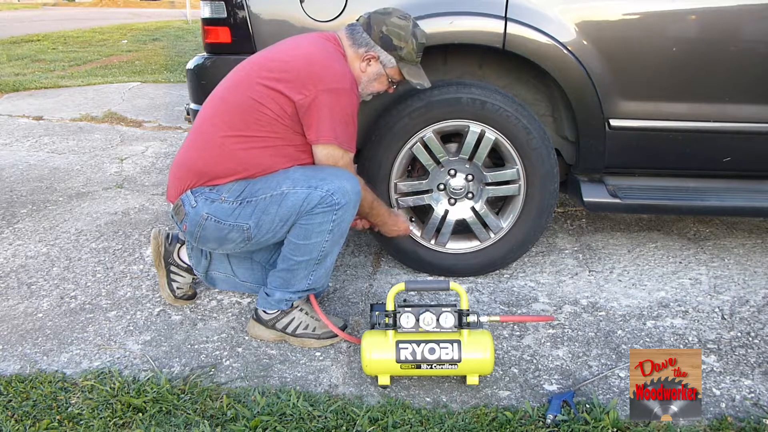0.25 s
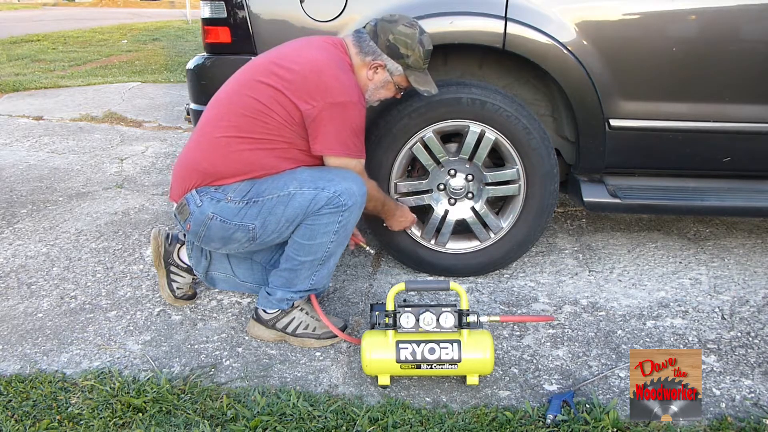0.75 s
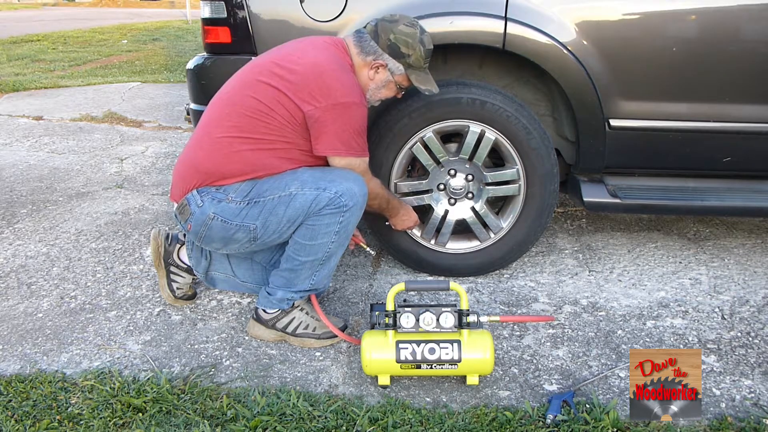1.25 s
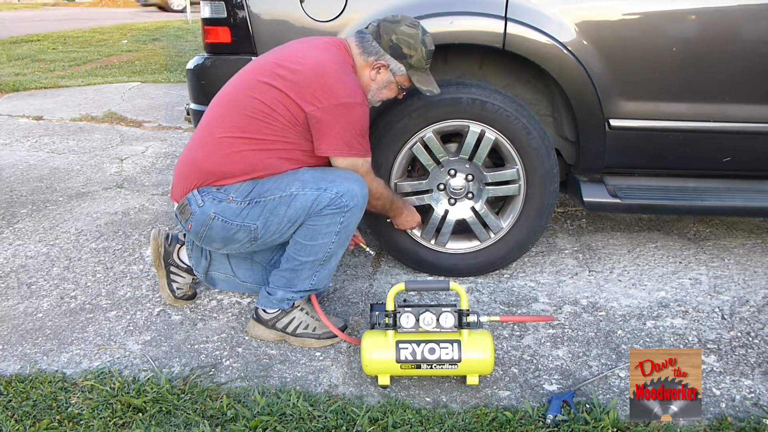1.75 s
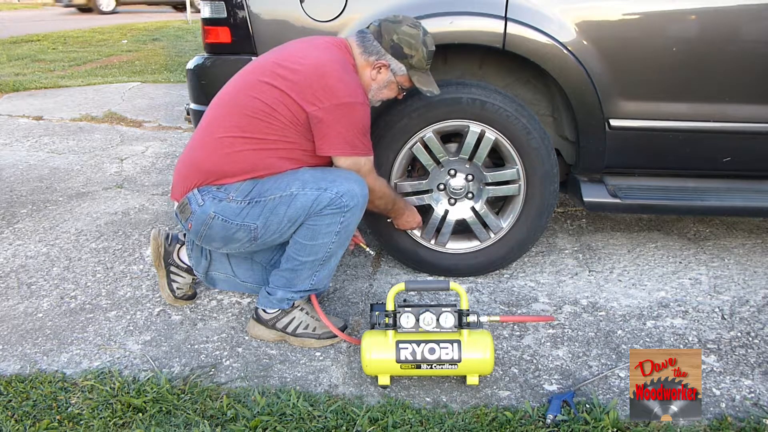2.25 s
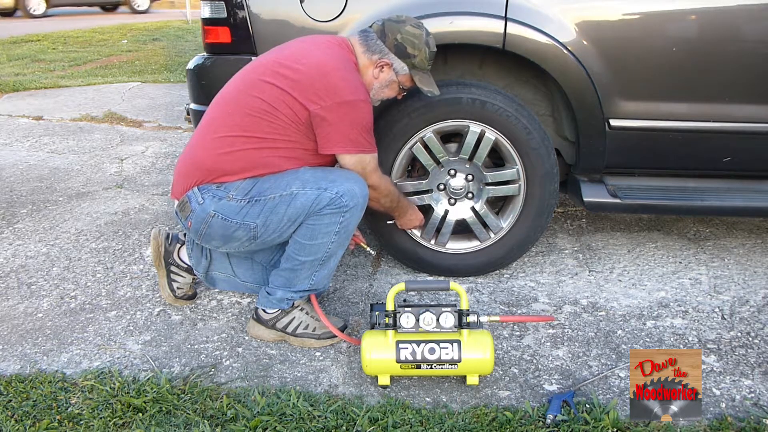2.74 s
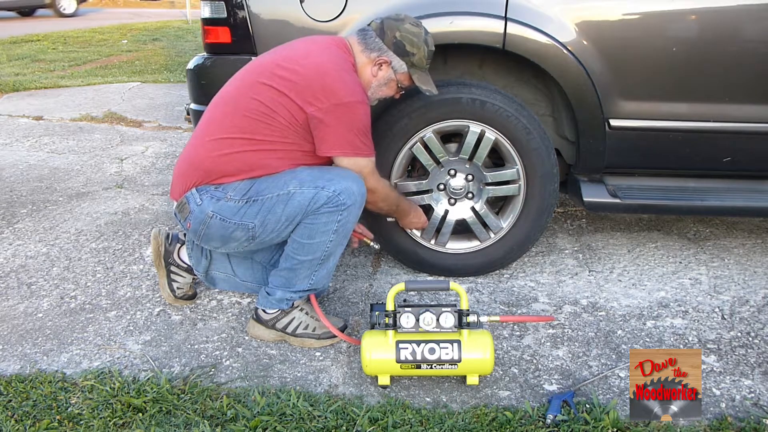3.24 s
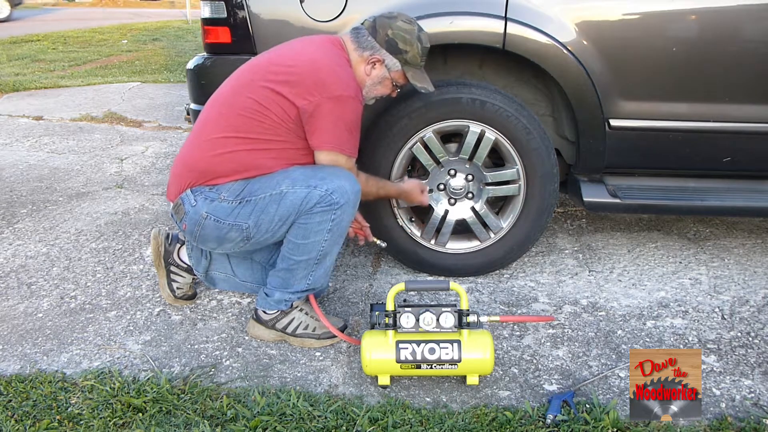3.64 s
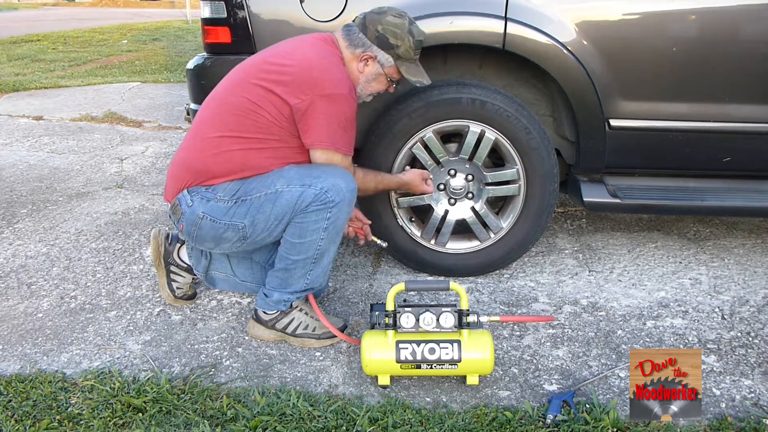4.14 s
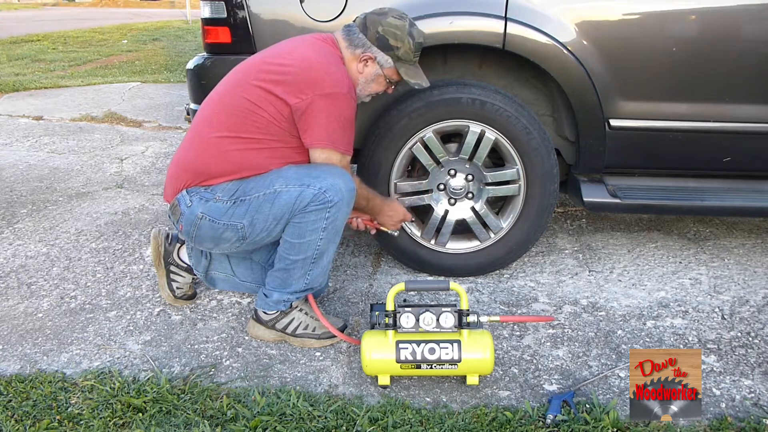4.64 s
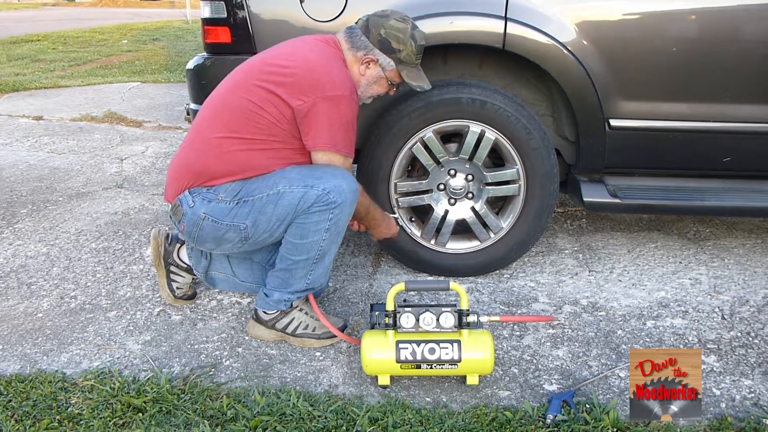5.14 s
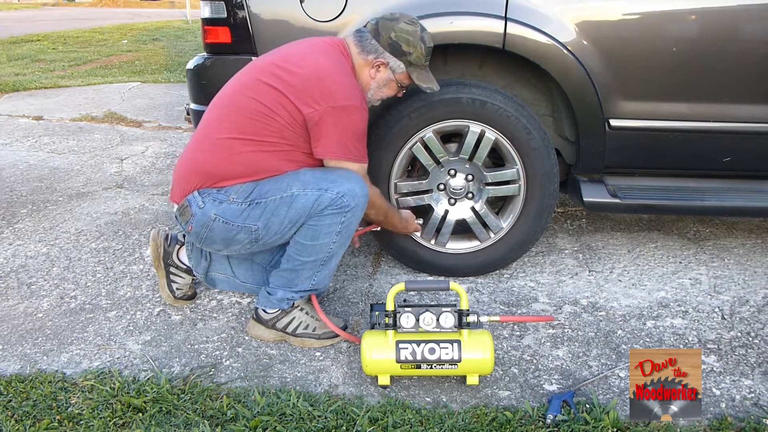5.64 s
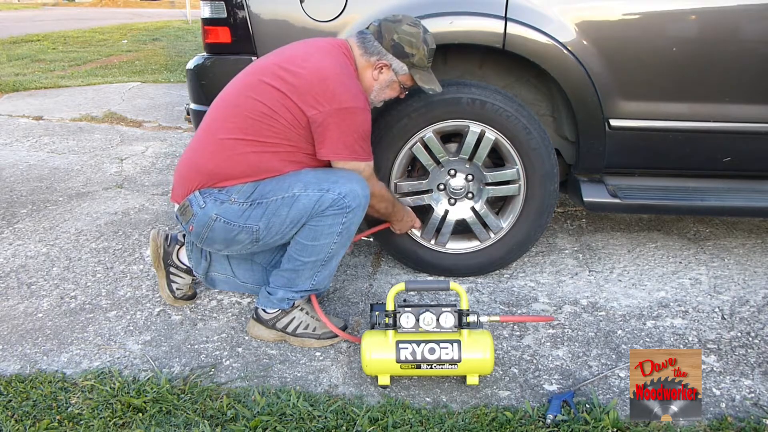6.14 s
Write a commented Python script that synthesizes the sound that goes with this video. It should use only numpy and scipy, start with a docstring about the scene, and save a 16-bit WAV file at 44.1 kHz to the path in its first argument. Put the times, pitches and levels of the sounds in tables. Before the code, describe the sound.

A small air compressor hums steadily outdoors while air hisses briefly at a tire valve, then spits once.

```python
"""A hum of about 86 strokes a second: a small cordless piston compressor fills a tyre on a concrete
driveway, in open air, slightly right of the microphone. Its metal parts sing and rattle, air rushes
through its valves, and it slows a little and grows harsher as the tank pressure rises.
From about 2 s air hisses as the hose chuck is handled at the tyre valve, then spits once;
the recorder's gain ducks under the escaping air."""
import sys
import numpy as np
from scipy import signal
from scipy.fft import rfft, irfft
from scipy.io import wavfile
from scipy.ndimage import uniform_filter1d

SR = 44100
rng = np.random.default_rng(int(sys.argv[2]) if len(sys.argv) > 2 else 0)


def persist_wave(psi):
    """Save psi, clipped to +-1, as 16-bit WAV."""
    counts = np.round(np.clip(psi, -1, 1) * 32767).astype(np.int16)
    wavfile.write(sys.argv[1], SR, np.atleast_2d(counts).T)


N = 281358
TIME = np.arange(N) / SR
START_HZ = 85.95  # strokes a second at first

# strong low orders of the stroke: (multiple of crank speed, light-load level [dB], heavy-load level [dB])
STROKE_ORDERS = [(1, -37, -37), (2, -18, -18), (3, -19, -20), (3.5, -26, -29), (4, -10, -11),
                 (4.5, -35, -39), (5, 0, 0), (5.5, -20, -23), (6, -34, -33), (6.5, -25, -27), (7, -6, -7),
                 (8, -8, -9), (9, -12, -16), (10, -18, -20), (11, -20, -19), (12, -17, -19), (13, -25, -26),
                 (14, -11, -17), (15, -29, -28), (16, -27, -23), (17, -33, -32), (18, -37, -24),
                 (19, -35, -34)]
# high orders that casing and tank radiate well:
# (multiple of crank speed, light-load level [dB], heavy-load level [dB])
RADIATED_ORDERS = [(23, -34, -31), (25, -30, -40), (26, -37, -35), (29, -35, -40), (31, -42, -37),
                   (33, -42, -34), (34, -35, -44), (37, -44, -29), (38, -46, -29), (39, -39, -32),
                   (40, -34, -35), (41, -36, -36), (42, -41, -33), (44, -39, -37), (45, -45, -30),
                   (46, -35, -37), (47, -28, -38), (49, -34, -31), (57, -39, -45), (58, -46, -34),
                   (59, -45, -38), (61, -40, -34), (71, -51, -41), (72, -41, -50), (73, -39, -44),
                   (74, -42, -45), (77, -44, -38), (90, -44, -42)]
# orders that swell as they pass through a metal resonance:
# (multiple of crank speed, peak time [s], level against the hum [dB], rise [s], fall [s])
SINGING_ORDERS = [(35, 0.68, -23.5, 0.71, 0.15), (35, 1.54, -16, 0.14, 0.52), (36, 1.92, -12.6, 0.72, 1.75),
                  (48, 1.76, -20.3, 0.8, 0.8)]


def from_db(db):
    """Decibels to gain."""
    return 10 ** (np.asarray(db) / 20)


def at_hz(points, hz, column=1):
    """One column of a spectrum, read on a log-frequency axis."""
    points = np.array(points)
    return np.interp(np.log(np.maximum(hz, 1)), np.log(points[:, 0]), points[:, column])


def drift(rate_hz):
    """Smooth random wavering with spread 1, mostly slower than rate_hz."""
    pole = np.exp(-80 * np.pi * rate_hz / SR)
    slow = signal.lfilter([1], [1, -2 * pole, pole * pole], rng.standard_normal(N // 40 + 2002))[2000:]
    return np.interp(np.arange(N) / 40, np.arange(len(slow)), slow / slow.std())


def coloured(x, spectrum):
    """Filter a sound by a table of (frequency [Hz], gain [dB])."""
    return irfft(rfft(x) * from_db(at_hz(spectrum, np.arange(N // 2 + 1) * SR / N)), N)


def crank(wobble, jitter_s, sag_hz=1.4, sag_s=10.8):
    """Turns of the crank: it slows as pressure builds, wavers, and strokes come a little early or late."""
    speed = START_HZ - sag_hz * (1 - np.exp(-TIME / sag_s))
    return np.cumsum(speed * (1 + wobble * drift(3.5))) / SR + speed * jitter_s * drift(52)


def stroke_cycle(lines, turns, size=16384):
    """Play complex rms strengths of orders 0, 1/2, 1, .. as a cycle two strokes long."""
    cycle = irfft(lines, size) * size / np.sqrt(2)
    return np.interp(turns / 2 % 1 * size, np.arange(size + 1), np.append(cycle, cycle[0]))


def order_gains(orders, hz, column):
    """Strength of the pump's orders at one load (column 1 light, 2 heavy), without the singing ones."""
    # rattle of piston and gears: (frequency [Hz], light-load level [dB], heavy-load level [dB])
    rattle = [(1840, -41, -43.5), (2430, -55, -50), (3000, -40, -32), (3940, -55, -47), (4400, -55, -46.5),
              (5330, -44.5, -41.5), (6700, -46, -47), (7100, -45, -49), (8100, -51.5, -46),
              (9200, -49.5, -59), (9800, -52, -52), (11600, -58, -59), (13400, -59, -65), (14800, -80, -73)]
    # half orders, as every other stroke differs a little: (frequency [Hz], level [dB])
    uneven_strokes = [(43, -66), (130, -50), (215, -42.5), (600, -46), (1100, -39), (1700, -50.5),
                      (2400, -46), (3200, -50), (5000, -57.5), (8000, -66), (15000, -60)]
    db = np.where(orders % 1, at_hz(uneven_strokes, hz), at_hz(rattle, hz, column))
    for row in STROKE_ORDERS + RADIATED_ORDERS:
        db[round(2 * row[0])] = row[column]
    sings = np.isin(orders, [row[0] for row in SINGING_ORDERS])
    return from_db(db) * (orders > 0) * ~sings


def pump(turns, scatter_db, wander, intake_hz, smear, rattle_hz, rocking_db, side_db, count=360):
    """Each stroke is a sharp gulp of air in the low orders and a spread of small contacts higher up."""
    light_until_s, heavy_from_s = 1.28, 4.86
    orders = np.arange(count) / 2
    hz = np.maximum(orders * START_HZ, 1)
    light, heavy = order_gains(orders, hz, column=1), order_gains(orders, hz, column=2)
    half = orders % 1 > 0
    weak = ~np.isin(orders, [row[0] for row in STROKE_ORDERS + RADIATED_ORDERS])
    loose = 1 / (1 + (rattle_hz / hz) ** 8)  # 0 in the hum, 1 in the rattle
    # suction is a pressure dip: orders near the intake resonance fall in step, the rattle does not
    lag = smear * np.log(hz / intake_hz) ** 2
    phase = np.pi - lag + np.where(half, 1, loose) * rng.uniform(-np.pi, np.pi, count)
    # the many modes of the casing favour some of the weak orders over their neighbours
    scatter = from_db(scatter_db * loose * weak * np.clip(rng.standard_normal((2, count)), -2, 1.5))
    # the pump rocks on its feet every second stroke, which lifts the half orders
    rocking = from_db(rocking_db * half * (1 - loose))
    voicing = scatter * rocking * np.exp(1j * phase)
    load = np.clip((TIME - light_until_s) / (heavy_from_s - light_until_s), 0, 1)
    hum = (1 - load) * stroke_cycle(light * voicing[0], turns)
    hum += load * stroke_cycle(heavy * voicing[1], turns)
    # the contacts shift slowly, so the weak high orders wander in strength
    rattle = loose * np.sqrt(light * heavy) * np.exp(2j * np.pi * rng.random((4, count)))
    shifting = wander * sum(drift(0.59) * stroke_cycle(weak * lines, turns) for lines in rattle[1:])
    # reflections from car and ground reach the two sides of the microphone differently
    side = from_db(side_db) * stroke_cycle(rattle[0], turns)
    return hum + shifting + np.array([side, -side])


def singing_metal(turns, flutter_db):
    """Metal parts ring as single orders drift through their resonances; neighbours beat once a stroke."""
    gains = {}
    for order, peak_s, db, rise_s, fall_s in SINGING_ORDERS:
        # 3 dB down rise_s before the peak and fall_s after it
        swell = 1 / np.hypot(1, (TIME - peak_s) / np.where(TIME < peak_s, rise_s, fall_s))
        gains[order] = np.maximum(gains.get(order, 0), from_db(db) * swell)
    ringing = np.zeros(N)
    for order, gain in gains.items():
        flutter = from_db(flutter_db * drift(25))
        ringing += np.sqrt(2) * gain * flutter * np.sin(2 * np.pi * (order * turns + rng.random()))
    return ringing


def turbulence(spectrum, side_db, ripple_db, ripple_hz=170):
    """Air noise with a fine random ripple in its treble; near rms 1 and much alike on both sides."""
    hz = np.arange(ripple_hz, SR / 2, ripple_hz)
    ripple = ripple_db * np.minimum(hz / 5000, 1) * np.clip(rng.standard_normal(len(hz)), -2, 1.2)
    air = coloured(rng.standard_normal((2, N)), spectrum)
    mid, side = coloured(air, np.column_stack([hz, ripple]))
    return (mid + from_db(side_db) * np.array([side, -side])) / mid.std()


def intake_rush(turns, level_db, pulsing_db):
    """Air noise, coloured by the pump head, swells several times in each stroke as the valves flap."""
    # air rushing through intake and valves: (frequency [Hz], relative level [dB])
    rush_colour = [(30, -112), (150, -86.5), (420, -78.5), (850, -81.5), (1200, -78.5), (1750, -90),
                   (2500, -93.5), (3100, -88), (4100, -88.5), (4500, -94.5), (7000, -99), (9200, -101),
                   (11500, -104), (15000, -113)]
    # treble resonances of the pump head: (frequency [Hz], width [Hz], lift [dB])
    head_modes = [(5300, 410, 5), (6540, 310, 9.5), (7770, 510, 9.5), (8540, 350, 8), (9930, 700, 9.5),
                  (11600, 500, 8.5), (12600, 340, 3), (13700, 440, 7)]
    hz = np.geomspace(20, SR / 2, 600)
    head_db = sum(db / (1 + (2 * (hz - centre) / width) ** 2) for centre, width, db in head_modes)
    air = turbulence(np.column_stack([hz, at_hz(rush_colour, hz) + head_db]), side_db=-14, ripple_db=3)
    flaps = np.zeros(14, complex)
    flaps[2::2] = np.exp(2j * np.pi * rng.random(6))  # whole orders 1 to 6
    swell = stroke_cycle(flaps, turns)
    return from_db(level_db + pulsing_db * swell / swell.std()) * air


def puff(start_s, hold_s, attack_s, release_s):
    """Envelope of escaping air: it grows until start_s, holds at 1 and dies away."""
    before_s, after_s = np.maximum(start_s - TIME, 0), np.maximum(TIME - start_s - hold_s, 0)
    return np.exp(-before_s / attack_s - after_s / release_s)


def jet(flow, colour, sputter_db, grain_db):
    """Escaping air, grainy and sputtering as the seal shifts."""
    unsteady = from_db(sputter_db * drift(43) + grain_db * drift(250))
    return flow * unsteady * turbulence(colour, side_db=-13, ripple_db=-1.0)


def chuck_leaks():
    """Air slips past the chuck as a thin hiss and a full gush; the widest opening rules at each moment."""
    # shifts of the chuck: (time [s], hold [s], hiss level [dB], gush level [dB])
    shifts = [(2.088, 0.025, -45, -53.5), (2.13, 0.09, -47.5, -51), (2.24, 0.02, -44.5, -47),
              (2.288, 0.03, -42.5, -47), (2.325, 0.012, -49, -43), (2.367, 0.077, -52, -61),
              (2.455, 0.03, -48.5, -54), (2.587, 0.035, -62, -50.5), (2.705, 0.03, -61.5, -55)]
    # jet from a thin gap: (frequency [Hz], relative level [dB])
    hiss_colour = [(1000, -18), (4000, -6), (7000, -2.5), (9500, 0.5), (12300, 1.5), (15000, -2.5)]
    # jet from a wide gap: (frequency [Hz], relative level [dB])
    gush_colour = [(700, -21), (1700, 4), (2600, 4), (3800, 5), (5400, 2), (6500, -5), (10000, -8),
                   (15000, -19)]
    flows = [from_db([[hiss_db], [gush_db]]) * puff(start_s, hold_s, attack_s=0.016, release_s=0.022)
             for start_s, hold_s, hiss_db, gush_db in shifts]
    hiss_flow, gush_flow = np.max(flows, axis=0)
    hiss = jet(hiss_flow, hiss_colour, sputter_db=1.8, grain_db=0.8)
    gush = jet(gush_flow, gush_colour, sputter_db=2.5, grain_db=-3.0)
    return hiss + gush


def valve_spit():
    """One short spit of air from the tyre valve."""
    # jet from the valve: (frequency [Hz], relative level [dB])
    spit_colour = [(900, -14), (1750, 0), (2600, -0.5), (4200, 4), (5050, -2), (5450, 4.5), (6000, -9.5),
                   (7900, 2.5), (8700, -3), (9600, 2), (11000, -2), (12300, -0.5), (15000, -5)]
    flow = from_db(-36.5) * puff(start_s=3.153, hold_s=0.003, attack_s=0.008, release_s=0.01)
    return jet(flow, spit_colour, sputter_db=2.0, grain_db=2.5)


def scene():
    """Compressor and escaping air on the open driveway, slightly right of the microphone."""
    # stereo balance at the microphone: (frequency [Hz], left minus right [dB])
    balance = [(100, 1), (400, 0), (700, 1), (1200, -2.5), (2400, -4), (4400, -2.5), (8000, -1.5),
               (15000, -1)]
    hum_db, early_db, settle_s = -30.0, 1.2, 0.8  # the pump is a little louder at first and settles
    turns = crank(wobble=0.00016, jitter_s=4e-6)
    machine = pump(turns, scatter_db=1.0, wander=0.33, intake_hz=434.6, smear=3.92,
                   rattle_hz=764, rocking_db=0.5, side_db=-16.5)
    machine += singing_metal(turns, flutter_db=0.72)
    machine += intake_rush(turns, level_db=-20.5, pulsing_db=2.0)  # level against the hum
    machine *= from_db(hum_db + early_db * np.exp(-TIME / settle_s))
    left, right = machine + chuck_leaks() + valve_spit()
    return np.array([coloured(left, [(hz, db / 2) for hz, db in balance]),
                     coloured(right, [(hz, -db / 2) for hz, db in balance])])


def gain_control(x, treble_hz, threshold_db, most_db, knee_db, attack_s, release_s):
    """Loud treble turns the whole sound down a little; the gain creeps back afterwards."""
    treble = signal.sosfilt(signal.butter(4, treble_hz, "high", fs=SR, output="sos"), x.mean(axis=0))
    treble_db = 10 * np.log10(uniform_filter1d(treble ** 2, 441) + 1e-18)  # power over 10 ms
    over_db = np.maximum(treble_db - threshold_db, 0)
    pole, fading = np.exp(-1 / (attack_s * SR)), np.exp(-TIME / release_s)
    cut_db = signal.lfilter([1 - pole], [1, -pole], most_db * np.tanh(over_db / knee_db))
    held_db = np.maximum.accumulate(cut_db / fading) * fading
    return x * from_db(-held_db)


def record(dry):
    """The recorder's gain ducks under each hiss, and the top is cut steeply at 15.4 kHz."""
    ducked = gain_control(dry, treble_hz=9000, threshold_db=-58.0, most_db=2.6, knee_db=5.0,
                          attack_s=0.027, release_s=0.42)
    return signal.sosfilt(signal.ellip(12, 0.1, 90, 15400, fs=SR, output="sos"), ducked)


dry = scene()
out = record(dry)
persist_wave(out)
```